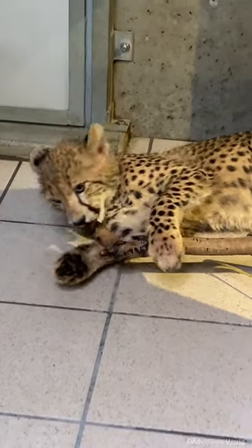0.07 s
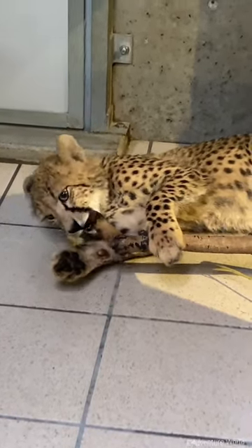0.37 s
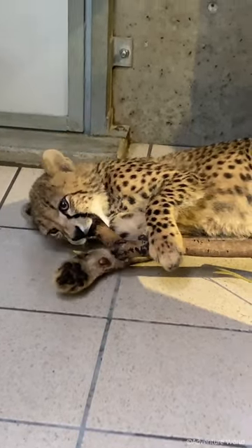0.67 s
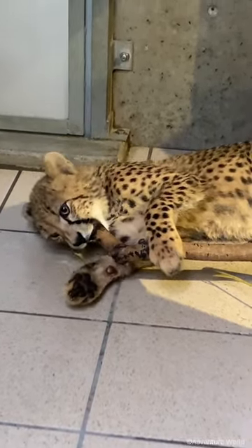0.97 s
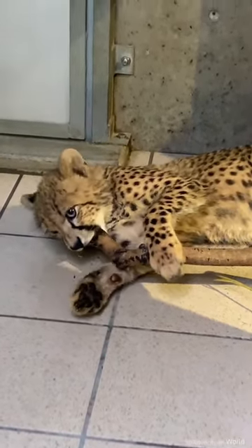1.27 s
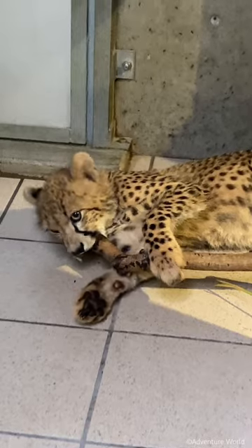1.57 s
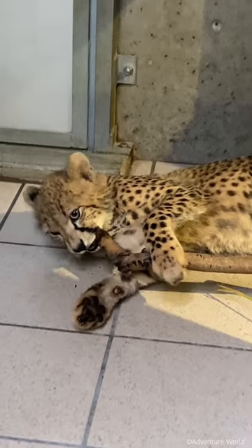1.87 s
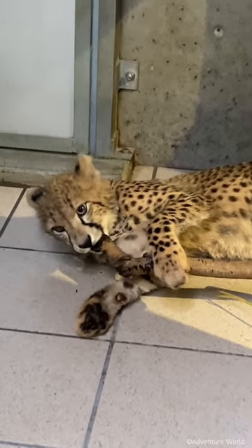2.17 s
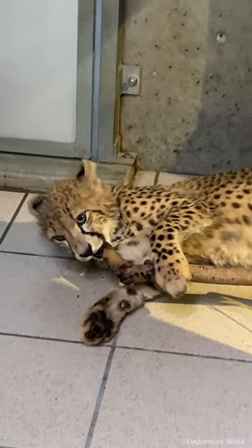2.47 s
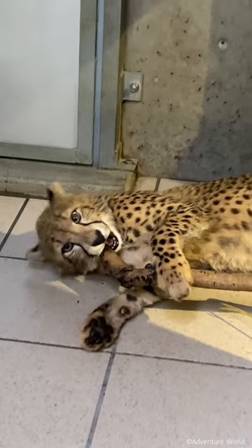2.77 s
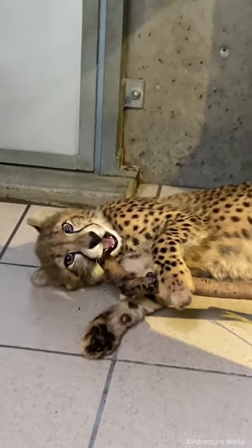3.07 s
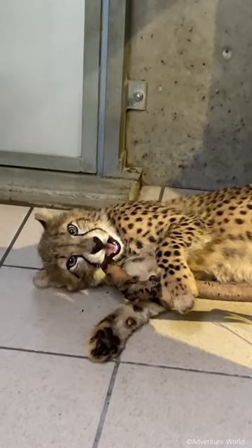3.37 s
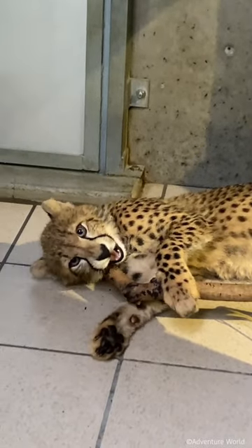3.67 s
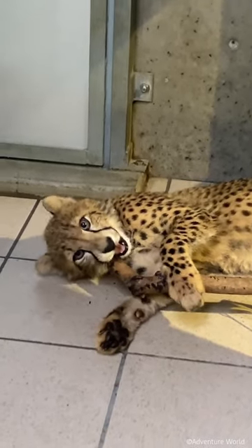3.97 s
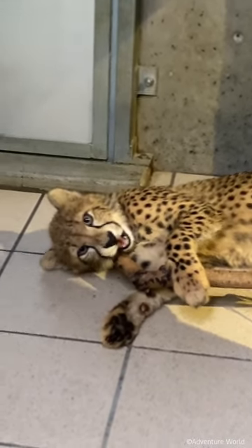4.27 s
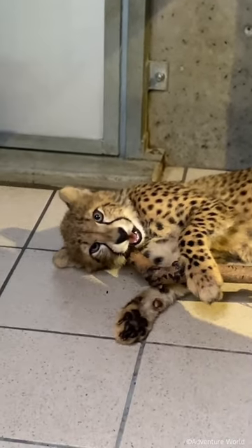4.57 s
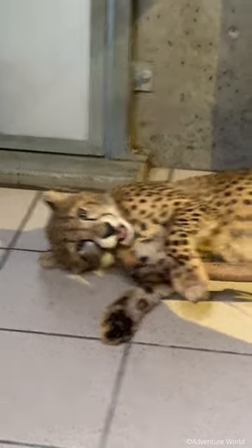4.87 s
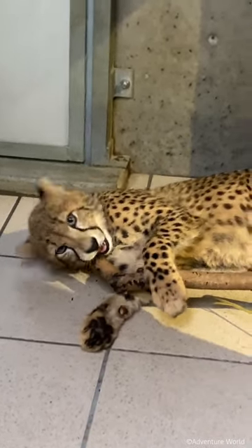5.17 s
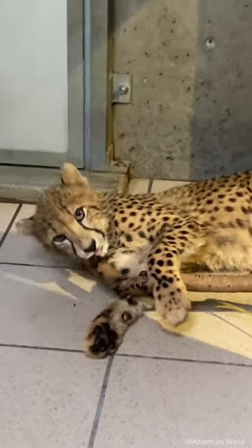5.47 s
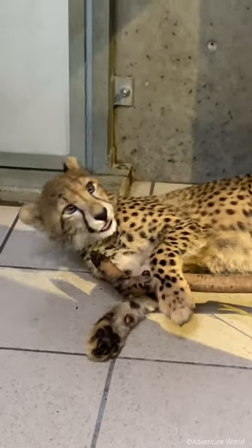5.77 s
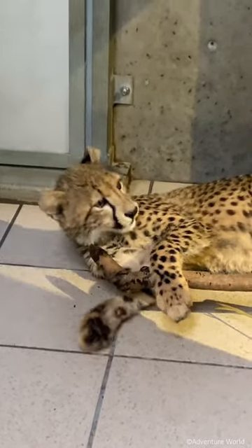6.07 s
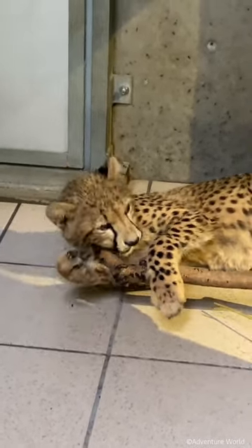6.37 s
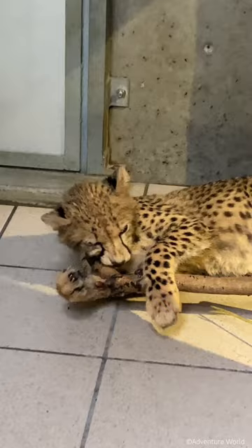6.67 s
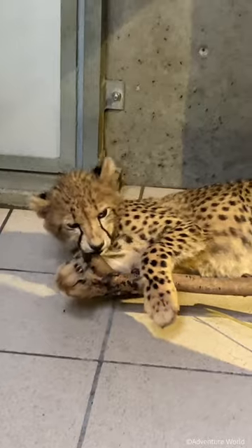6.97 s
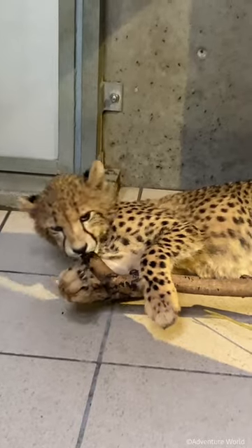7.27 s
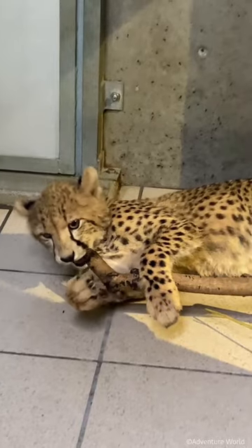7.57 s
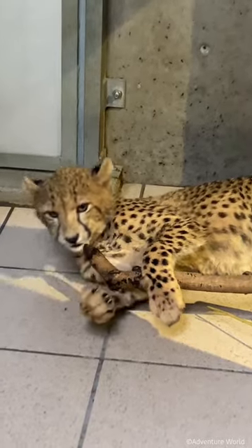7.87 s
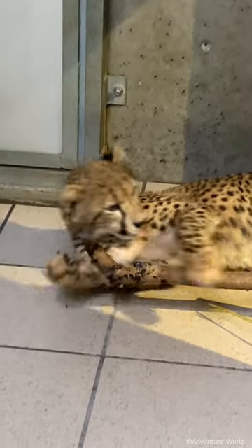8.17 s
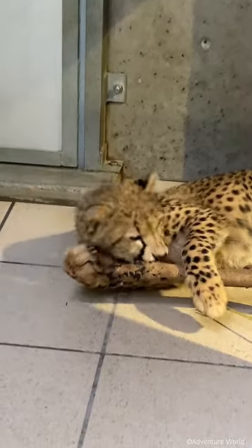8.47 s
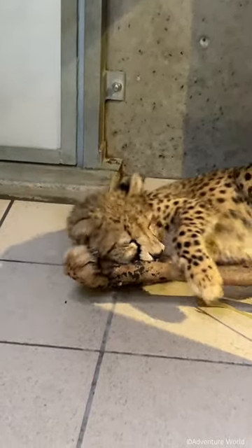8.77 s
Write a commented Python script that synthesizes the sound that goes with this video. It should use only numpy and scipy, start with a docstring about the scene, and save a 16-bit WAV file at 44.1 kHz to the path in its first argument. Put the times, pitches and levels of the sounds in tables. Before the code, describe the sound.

A cheetah cub chirps six times in a hard-walled indoor pen. Each call is a short, high, nearly pure whistle that glides down like a bird's and leaves a brief echo. Four come at steady intervals, then two more after a pause. Ventilation rumbles and hums faintly with a thin hiss, and the microphone dips the background at every chirp.

```python
"""A cheetah cub lying on the tiles of a concrete pen gives six chirps, nearly pure whistles gliding down.
Each interferes with its echo from a close wall, and the hard room reverberates after it.
Underneath, ventilation rumbles and hums, a thin hiss fades and partly returns, and a faint tone
surfaces once. Automatic gain control behind the microphone pair ducks the whole room at every chirp."""
import sys
import numpy as np
from scipy import signal
from scipy.fft import rfft, irfft, next_fast_len
from scipy.io import wavfile
from scipy.ndimage import uniform_filter1d, minimum_filter1d, map_coordinates

SR = 44100
rng = np.random.default_rng(int(sys.argv[2]) if len(sys.argv) > 2 else 0)


def wav_record(signal):
    """Record a signal, one row per channel, as 16-bit PCM in the file named by sys.argv[1]."""
    frames = np.transpose(np.atleast_2d(signal))
    bounded = np.clip(frames, -1, 1)
    # unit amplitude maps onto the largest positive 16-bit level
    quanta = np.round(bounded * 32767).astype(np.int16)
    wavfile.write(sys.argv[1], SR, quanta)


N = 388962

# Spectrum of the air in the ducts. Each row: frequency in Hz, relative density in dB.
DUCT_SPECTRUM = [(20, -33), (48, -11.5), (68, -0.5), (95, -3), (140, -3.5), (195, 0), (222, -4), (315, 0),
                 (375, -5), (435, -7), (520, -7.5), (850, -8.5), (1600, -15.5), (2200, -22), (3100, -22.5),
                 (4200, -25.5), (8500, -28.5), (15000, -42)]
# The fan's tones. Each row: frequency in Hz, rms level in dB, blur from 0 to 1.
FAN_TONES = [(74.5, -48.5, 0.8), (116.7, -45.5, 0.43), (175.2, -51.5, 0.45), (233.2, -45.5, .15),
             (348.8, -49.5, 0.85), (390.4, -54.5, .5), (467.2, -55, .7), (748.3, -56, 1)]
# Spectrum of the hiss. Each row: frequency in Hz, relative density in dB.
HISS_SPECTRUM = [(500, -2.5), (2500, -9), (5000, 2), (6100, 2.5), (7300, 2), (10500, 1), (13000, -1),
                 (16000, -8)]
# The chirps, one list each. Each row: time in seconds, pitch in Hz, level at the source in dB.
CHIRPS = [
    [(.205, 5580, -46), (.221, 5600, -35.5), (.251, 5010, -23), (.274, 4380, -15), (.291, 3980, -26),
     (.303, 3775, -16.5), (.316, 3820, -28)],
    [(1.772, 5700, -49), (1.805, 5220, -27), (1.825, 4700, -24.5), (1.837, 4280, -19), (1.855, 3960, -20),
     (1.872, 3680, -21.5), (1.892, 3620, -21)],
    [(3.056, 5690, -50), (3.071, 5560, -35), (3.095, 4700, -14), (3.108, 4443, -9.5), (3.125, 4035, -15),
     (3.147, 3730, -14.5), (3.163, 3556, -12)],
    [(4.548, 5840, -41), (4.574, 5580, -24), (4.592, 5010, -11.5), (4.606, 4710, -18), (4.623, 4280, -11.5),
     (4.641, 3930, -15.5), (4.663, 3590, -18.5)],
    [(7.463, 6000, -43), (7.48, 5490, -28), (7.496, 5080, -23), (7.527, 4510, -12.5), (7.537, 4180, -12),
     (7.547, 3843, -13.5), (7.556, 3840, -8)],
    [(8.512, 5900, -44), (8.546, 5160, -23.5), (8.566, 4590, -12.5), (8.587, 3900, -8.5),
     (8.596, 3760, -17), (8.607, 3394, -10.5), (8.631, 3380, -22)],
]
# The mouth passes overtones best near 7.5 kHz. Each row: frequency in Hz, overtone gain in dB.
MOUTH_RESPONSE = [(6600, -16.5), (7500, -12.5), (8500, -16.5), (10000, -19), (11500, -14), (13000, -14),
                  (16000, -17)]
# How the cub faces at each chirp. Each row: brightness in dB, close echo's delay in milliseconds,
# its strength from 0 to 1, room echo gain in dB (higher when the mouth points away).
FACING = [ (1, 3.23, 1, 1), (-1.5, 4.1, .6, 7), (-1, 3.95, 1, 0), (1.5, 2.2, 0.76, .5),
          (2.5, 2.6, 0.8, -2.5), (2, 3.35, 1, -2.5), ]
# Extra phase difference of the direct sound. Each row: frequency in Hz, left's lead in radians.
DIRECT_LEAD = [(3500, .9), (3900, 1.8), (4150, 2.3), (4450, 1.7), (4700, 1.1), (4950, -.65), (5200, -.45),
               (5500, -.45), (6000, -.6), (7500, 0), (9500, -.4)]
# Likeness of left and right in a diffuse field. Each row: frequency in Hz, coherence from 0 to 1.
COHERENCE = [(80, 0.97), (150, 0.94), (300, 0.78), (650, 0.38), (1400, 0.12), (2500, 0.39), (4200, 0.35),
             (5500, 1), (6300, 0.8), (10000, 0.84), (11400, 1), (14000, 1)]
# The pen's reverberation time. Each row: frequency in Hz, seconds to decay by 60 dB.
PEN_T60 = [(3000, 0.42), (4500, 0.42), (8000, 0.31), (15000, 0.31)]
# Phase difference of the microphone pair. Each row: frequency in Hz, left's lead in radians.
MICROPHONE_LEAD = [(950, 0), (1700, 2.2), (3200, 2.9), (4500, 2.55), (5400, 3.08), (6100, 3.22),
                   (7700, 5.7), (9500, 6.9), (11200, 9.3), (12200, 9.55), (14800, 12.6)]


def amp(db):
    """Decibels to amplitude ratio."""
    return 10 ** (np.asarray(db) / 20)


def unit(x):
    """Scale to rms 1."""
    return x / np.sqrt(np.mean(x ** 2) + 1e-20)


def along(points, hz):
    """Interpolate (Hz, value) points on a logarithmic frequency axis."""
    f, v = np.transpose(points)
    return np.interp(np.log(hz + 1), np.log(f + 1), v)


def wobble(rate):
    """A smooth random curve with rate knots a second."""
    knots = rng.standard_normal(int(N * rate / SR) + 4)
    return map_coordinates(knots, [np.arange(N) * rate / SR])


def samples(chirp):
    """The sample indices that a chirp spans."""
    return np.arange(int(chirp[0][0] * SR), int(chirp[-1][0] * SR))


def filtered(x, response):
    """Linear filtering: the spectrum is multiplied by a complex frequency response."""
    size = x.shape[-1]
    padded = next_fast_len(size + 8192)
    return irfft(rfft(x, padded) * response(np.fft.rfftfreq(padded, 1 / SR)), padded)[..., :size]


def phase_shifted(x, lead):
    """Phase difference: left advances by half the lead and right lags by half."""
    return filtered(x, lambda hz: np.exp(.5j * along(lead, hz) * np.array([[1], [-1]])))


def diffuse(pair):
    """Diffuse field: two unrelated signals mix into a partly coherent left and right."""
    angle = lambda hz: np.arccos(np.clip(along(COHERENCE, hz), 0, 1)) / 2
    mid, side = filtered(pair, lambda hz: np.array([np.cos(angle(hz)), np.sin(angle(hz))]))
    return np.array([mid + side, mid - side])


def coloured_noise(spectrum, patchy_db):
    """Spectral shaping: diffuse noise of rms 1, with brief patches of random gain."""
    bins = signal.stft(rng.standard_normal((2, N)), nperseg=1024)[2]
    patches = uniform_filter1d(rng.standard_normal(bins.shape[1:]), size=2, axis=0)
    patches = uniform_filter1d(patches, size=14, axis=1)
    pair = signal.istft(bins * amp(patchy_db * unit(patches)), nperseg=1024)[1][:, :N]
    return unit(diffuse(filtered(pair, lambda hz: amp(along(spectrum, hz)))))


def ventilation(air_db, surge_db):
    """Flow noise: air rumbles in the ducts, swelling slightly, along with the fan's hum."""
    air = amp(air_db + surge_db * wobble(8.6)) * coloured_noise(DUCT_SPECTRUM, patchy_db=3.0)
    hum = fan_hum(join_at=6.6, join_s=.8, join_hz=265.4, join_db=-50.5)
    return (air + hum) * amp([[-.3], [.3]])  # slightly stronger on the right


def fan_hum(join_at, join_s, join_hz, join_db):
    """Random modulation: turbulence blurs tones into narrow bands. A further machine tone joins late."""
    t = np.arange(N) / SR

    def tone(hz, blur):
        drift_rate = 7 + .02 * hz
        envelope = 1 + blur * (wobble(drift_rate) + 1j * wobble(drift_rate))
        return unit(np.real(envelope * np.exp(2j * np.pi * hz * t)))

    fan = sum(amp(db) * tone(hz, blur) for hz, db, blur in FAN_TONES)
    joined = np.clip((t - join_at) / join_s, 0, 1)
    return fan + joined * amp(join_db) * tone(join_hz, blur=0.82)


def hiss(first_db, faded_db, back_db, fade_at, fade_s, back_at, back_s):
    """Broadband noise: its level relaxes exponentially towards a floor, then steps partly back."""
    t = np.arange(N) / SR
    fading_db = faded_db + (first_db - faded_db) * np.exp(-np.maximum(t - fade_at, 0) / fade_s)
    back = np.clip((t - back_at) / back_s, 0, 1)
    return amp((1 - back) * fading_db + back * back_db) * coloured_noise(HISS_SPECTRUM, patchy_db=2.0)


def cub(flutter_db, third_db, edge_s):
    """Source and filter: the throat makes an unsteady falling whistle; the mouth weights its overtones."""
    fall_rasp, bottom_rasp = 0.009, 0.006  # unsteadiness as a share of the pitch
    full_rasp_hz_per_s = 26000
    ease = int(.007 * SR)  # the throat rounds off every change
    voice = np.zeros(N)
    waver, flutter = wobble(600), flutter_db * wobble(170)
    for chirp, (bright_db, *_) in zip(CHIRPS, FACING):
        span = samples(chirp)
        t = (span - span[0]) / SR
        times, *contours = np.transpose(chirp)
        glide_hz, db = (uniform_filter1d(np.interp(span / SR, times, c), ease) for c in contours)
        falling = np.minimum(np.abs(np.gradient(glide_hz)) * SR / full_rasp_hz_per_s, 1)
        rasp = falling * fall_rasp + (1 - falling) * bottom_rasp
        pitch = glide_hz * (1 + rasp * waver[span])
        phase = 2 * np.pi * np.cumsum(pitch) / SR
        gate = np.sin(np.pi / 2 * np.clip(np.minimum(t, t[-1] - t) / edge_s, 0, 1)) ** 2
        second, third = (amp(along(MOUTH_RESPONSE, k * pitch)) * np.sin(k * phase) for k in (2, 3))
        overtones = second + amp(third_db) * third
        voice[span] += gate * amp(db + flutter[span]) * (np.sin(phase) + amp(bright_db) * overtones)
    return voice


def wall_bounce(voice):
    """Comb filtering: the wall behind the cub adds an echo, so the glide throbs through the notches."""
    heard = voice.copy()
    for chirp, (_, delay_ms, strength, _) in zip(CHIRPS, FACING):
        span = slice(samples(chirp)[0], samples(chirp)[-1] + 512)  # room for the delay
        echo = filtered(voice[span], lambda hz: np.exp(-2j * np.pi * hz * delay_ms / 1000))
        heard[span] += strength * echo
    return heard


def early_reflections(size, spread_s, count):
    """Path difference: each separate echo comes from its own side and reaches one microphone sooner."""
    taps = np.zeros((2, size))
    for when, side, strength in rng.uniform(-1.1, 1, (count, 3)):
        at = 4 + int(abs(when) * spread_s * SR)
        taps[[0, 1], [at, at + round(4 * side)]] += strength
    return taps


def pen_reverberation(voice, early_db, spread_s, tail_db, build_s, gap_s):
    """Reverberation: floor and door echo first, then a diffuse field builds and decays exponentially."""
    heard = np.zeros((2, N))
    size = int(.8 * SR)
    for chirp, (*_, echo_db) in zip(CHIRPS, FACING):
        # the head turns between chirps, so each meets other echoes
        hz, t, bins = signal.stft(rng.standard_normal((2, size)), SR, nperseg=256)
        decay = amp(-60 * t / along(PEN_T60, hz)[:, None])
        tail = diffuse(signal.istft(bins * decay, SR, nperseg=256)[1][:, :size])
        tail *= 1 - np.exp(-np.arange(size) / SR / build_s)
        early = early_reflections(size, spread_s, count=7)
        response = (amp(tail_db) * unit(tail) + amp(early_db) * unit(early)) / np.sqrt(size)
        span = samples(chirp)
        arrival = span[0] + int(gap_s * SR)
        echoes = signal.fftconvolve(voice[None, span], response, axes=1)[:, :N - arrival]
        heard[:, arrival:arrival + echoes.shape[1]] += amp(echo_db) * echoes
    return heard


def faint_tone(peak_at, width_s, hz, peak_db, waver_rad):
    """Phase modulation: a weak tone wavers as it swells and sinks under a Gaussian envelope."""
    t = np.arange(N) / SR
    swell = amp(peak_db) * np.exp(-((t - peak_at) / width_s) ** 2)
    return swell * np.sin(2 * np.pi * hz * t + waver_rad * wobble(43))


def scene():
    """Superposition: the cub's direct sound and the pen's echoes add to the background."""
    voice = cub(flutter_db=3.5, third_db=-13.5, edge_s=0.0035)
    direct = amp(-2.0) * phase_shifted(wall_bounce(voice), DIRECT_LEAD)
    room = pen_reverberation(voice, early_db=-13, spread_s=.035, tail_db=-.3, build_s=.015, gap_s=.005)
    rumble = ventilation(air_db=-36.5, surge_db=0.75)
    thin_hiss = hiss(first_db=-38.5, faded_db=-51, back_db=-46,
                     fade_at=3.07, fade_s=0.85, back_at=7.04, back_s=0.029)
    tone = faint_tone(peak_at=4.87, width_s=0.091, hz=1040, peak_db=-41.5, waver_rad=0.98)
    return direct + room + rumble + thin_hiss + tone


def gain_control(x, threshold_db, slope, hold_s, release_db_per_s, attack_s):
    """Compression: the first peak slips through; then the gain falls, holds a moment and recovers."""
    past = lambda s: dict(size=int(s * SR) // 2 * 2 + 1, origin=int(s * SR) // 2)  # a causal window
    power = np.abs(uniform_filter1d(np.mean(x ** 2, axis=0), **past(attack_s / 2)))
    excess_db = np.maximum(10 * np.log10(power + 1e-12) - threshold_db, 0)
    held_db = minimum_filter1d(-slope * excess_db, **past(hold_s))
    recovery_db = release_db_per_s * np.arange(N) / SR
    gain_db = np.minimum.accumulate(held_db - recovery_db) + recovery_db
    return x * amp(uniform_filter1d(gain_db, **past(attack_s)))


def limiter(x, ceiling_db, window_s):
    """Peak limiting: a smooth dip in gain eases the remaining peaks down to the ceiling."""
    size = int(window_s * SR) + 1
    needed = np.minimum(1, amp(ceiling_db) / (np.abs(x).max(axis=0) + 1e-9))
    return x * uniform_filter1d(minimum_filter1d(needed, size), size)


def record(dry):
    """Transduction: the microphone pair shifts phase; gain control, limiter and band limit follow."""
    pair = phase_shifted(dry, MICROPHONE_LEAD)
    ducked = gain_control(pair, threshold_db=-19.5, slope=0.85,
                          hold_s=0.13, release_db_per_s=83, attack_s=0.021)
    limited = limiter(ducked, ceiling_db=-4.2, window_s=.004)
    return filtered(limited, lambda hz: hz < 15800)


dry = scene()
out = record(dry)
wav_record(out)
```